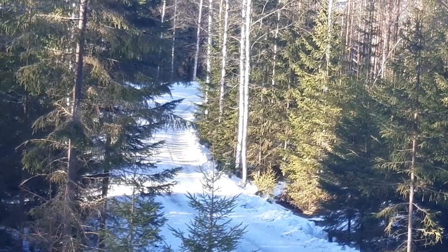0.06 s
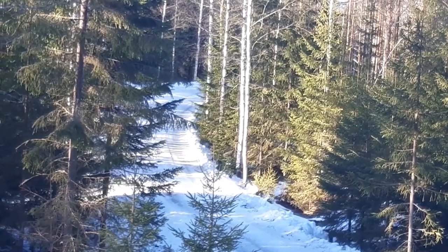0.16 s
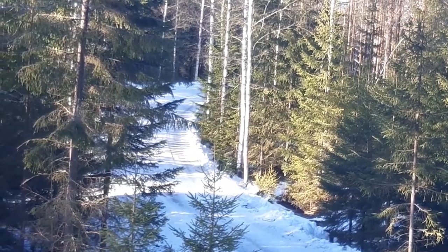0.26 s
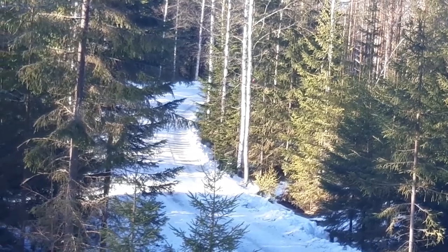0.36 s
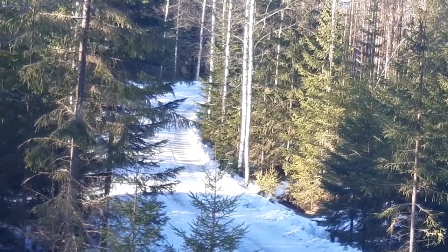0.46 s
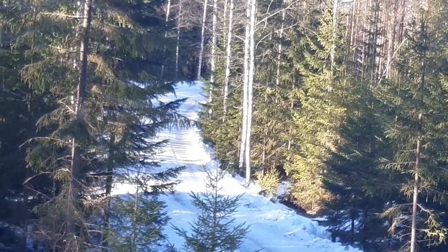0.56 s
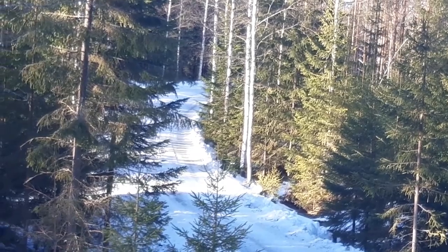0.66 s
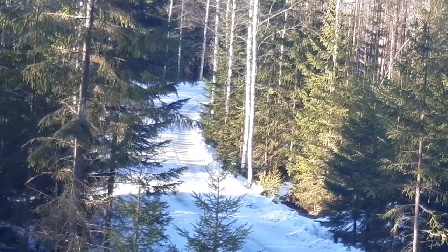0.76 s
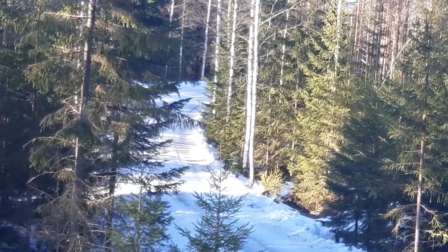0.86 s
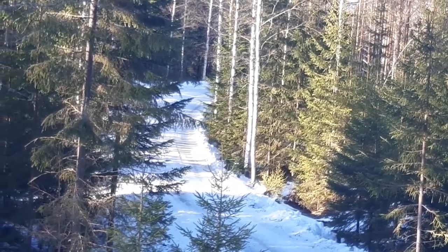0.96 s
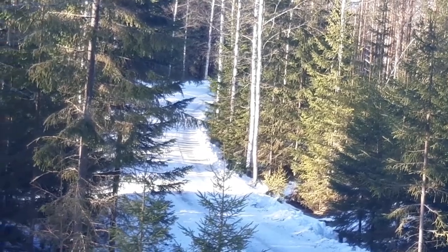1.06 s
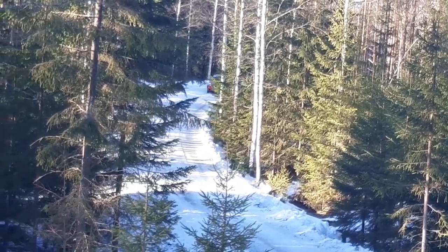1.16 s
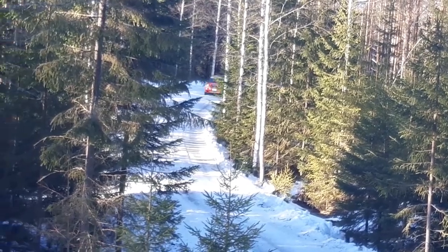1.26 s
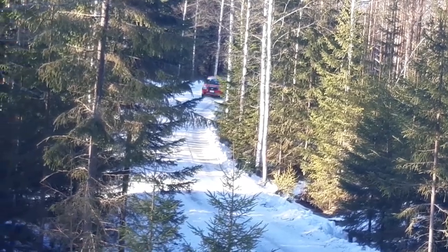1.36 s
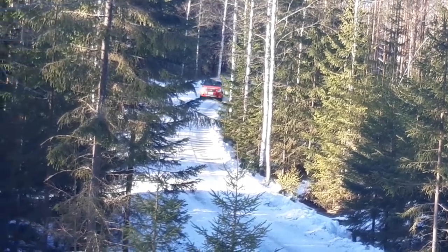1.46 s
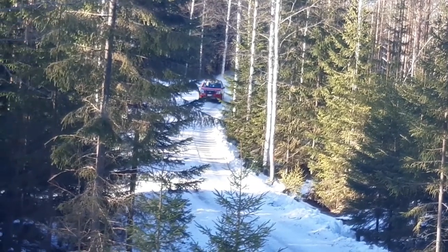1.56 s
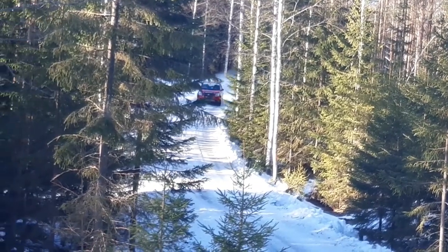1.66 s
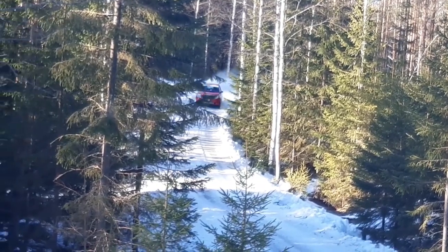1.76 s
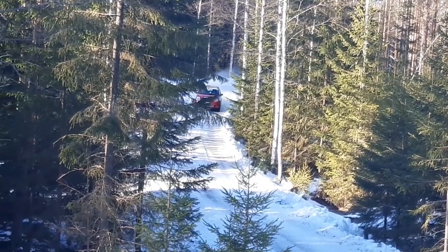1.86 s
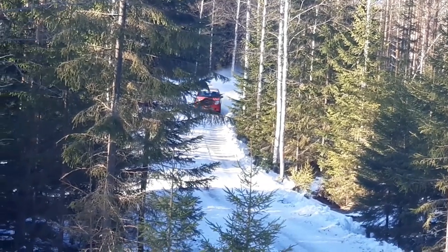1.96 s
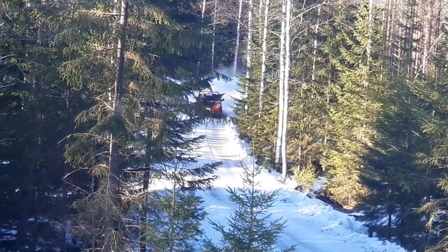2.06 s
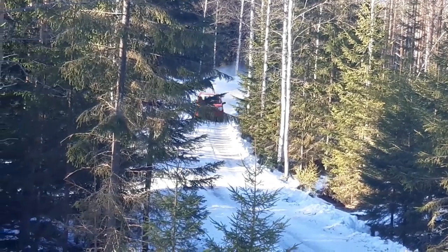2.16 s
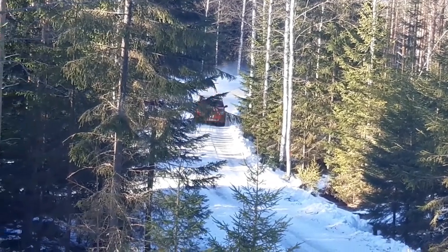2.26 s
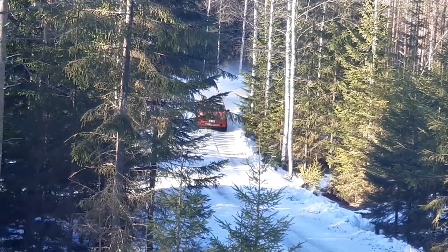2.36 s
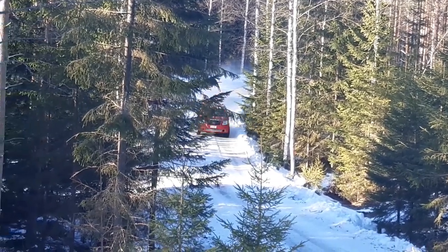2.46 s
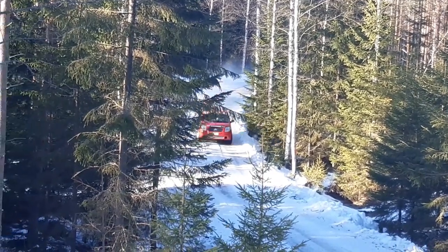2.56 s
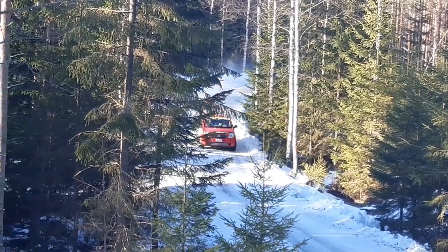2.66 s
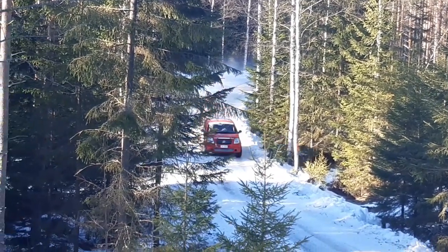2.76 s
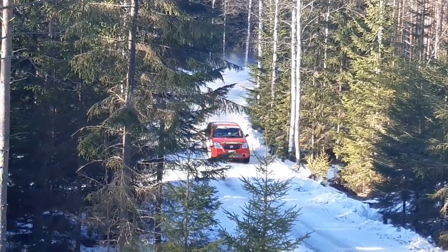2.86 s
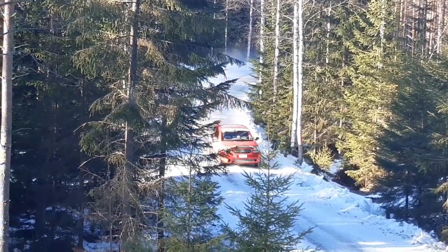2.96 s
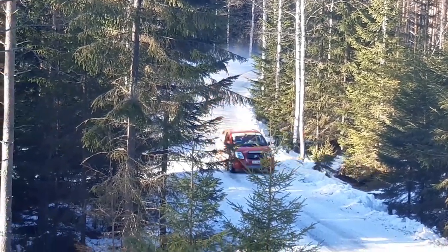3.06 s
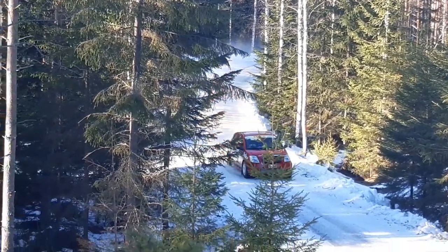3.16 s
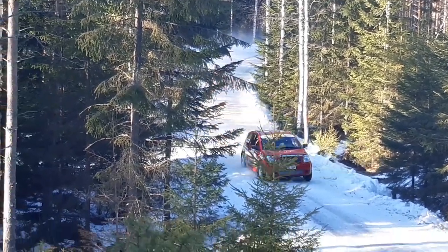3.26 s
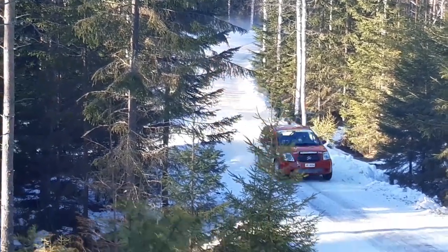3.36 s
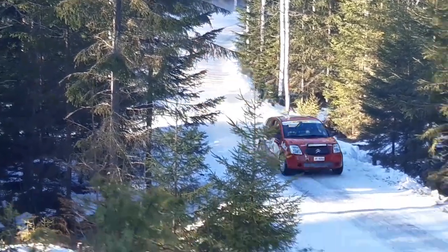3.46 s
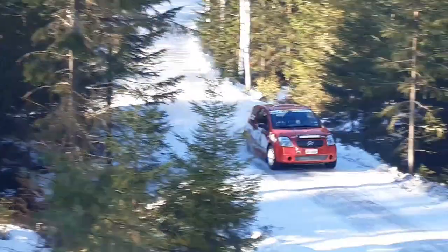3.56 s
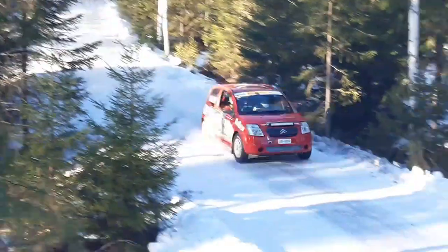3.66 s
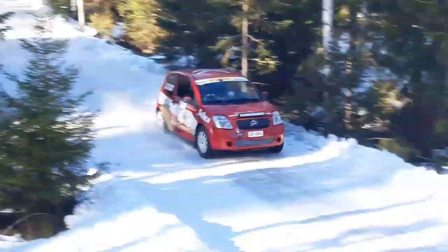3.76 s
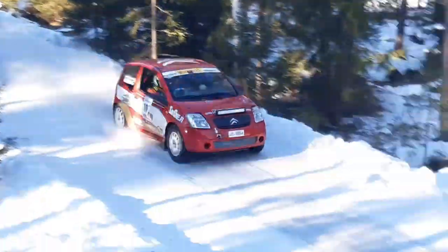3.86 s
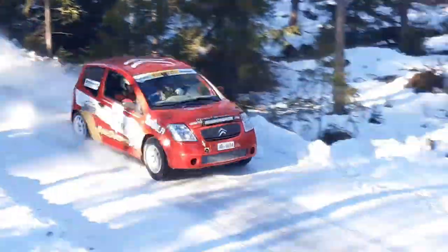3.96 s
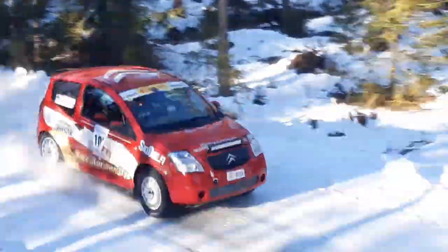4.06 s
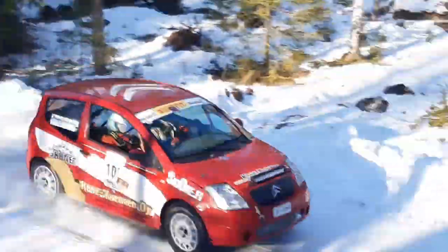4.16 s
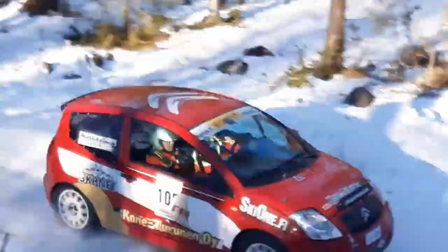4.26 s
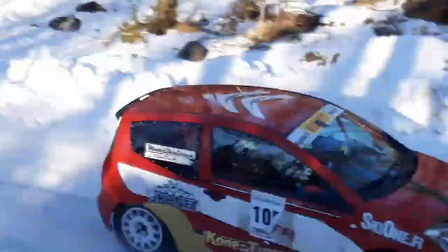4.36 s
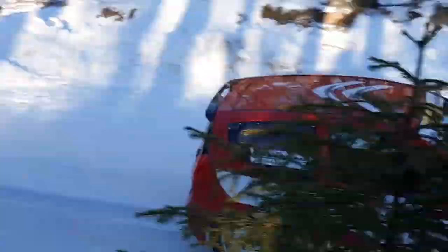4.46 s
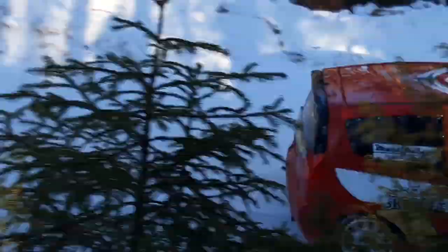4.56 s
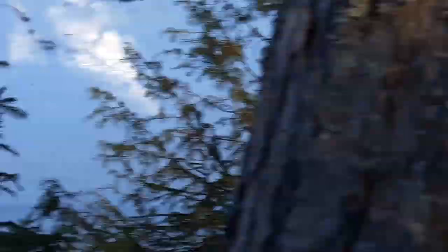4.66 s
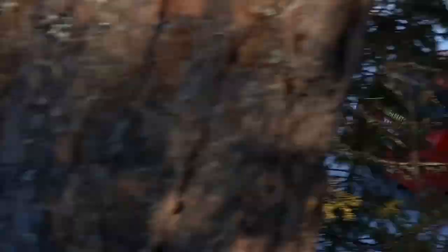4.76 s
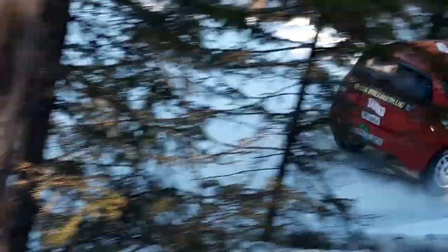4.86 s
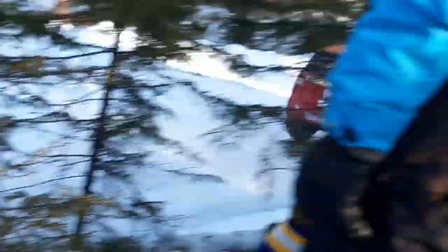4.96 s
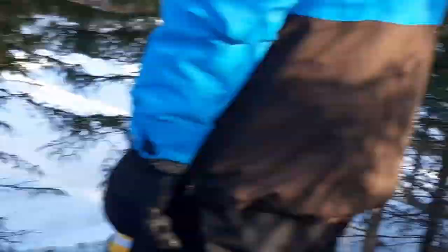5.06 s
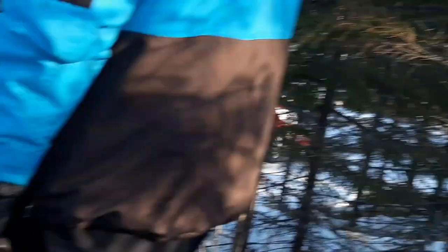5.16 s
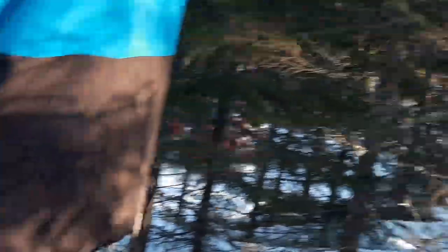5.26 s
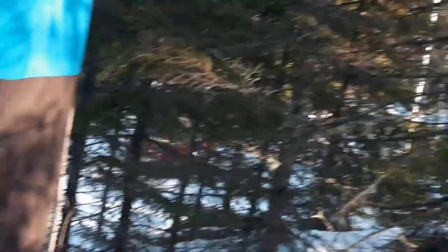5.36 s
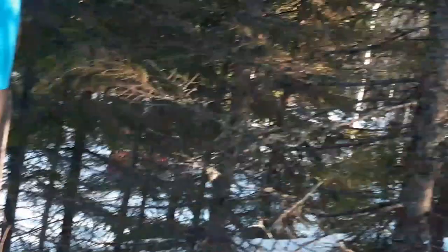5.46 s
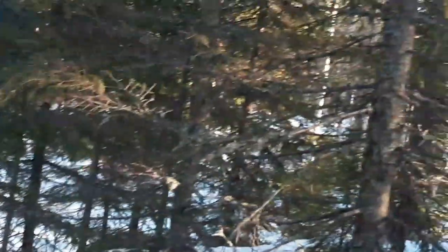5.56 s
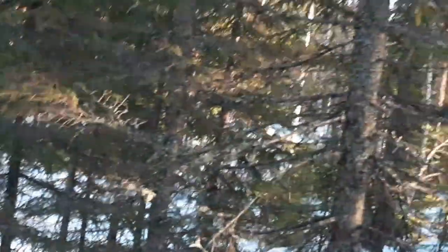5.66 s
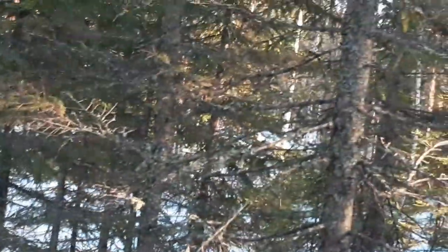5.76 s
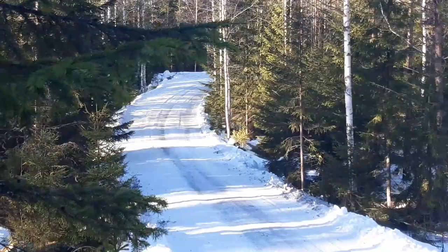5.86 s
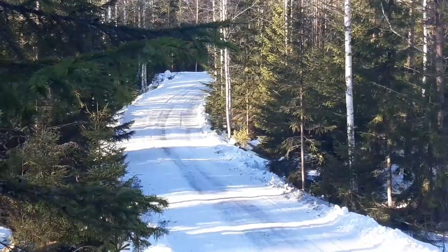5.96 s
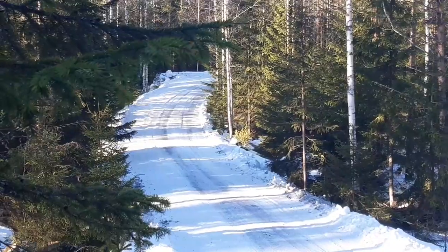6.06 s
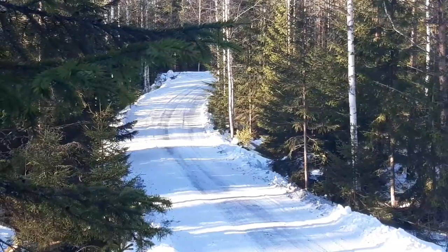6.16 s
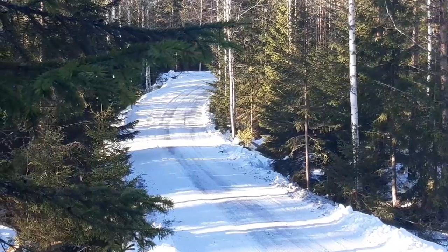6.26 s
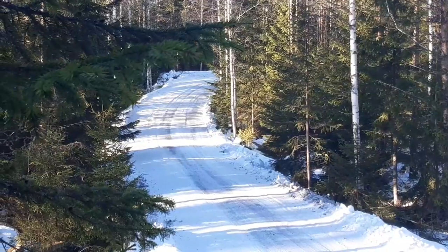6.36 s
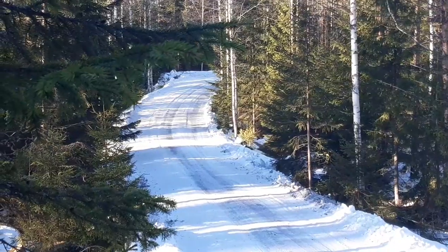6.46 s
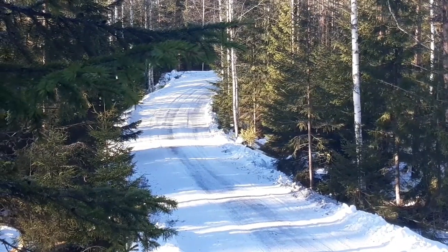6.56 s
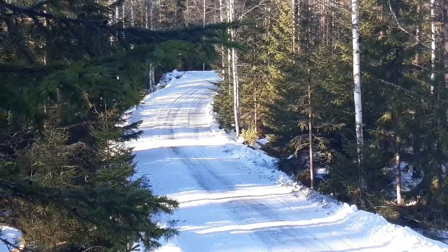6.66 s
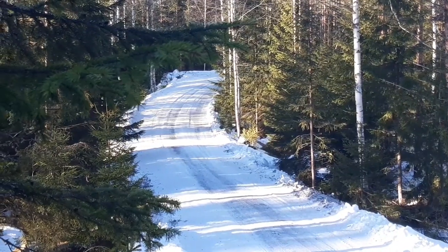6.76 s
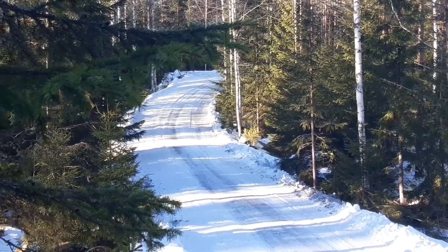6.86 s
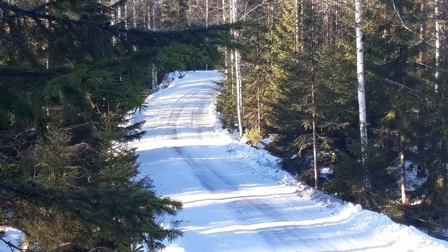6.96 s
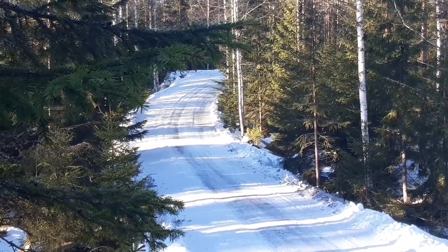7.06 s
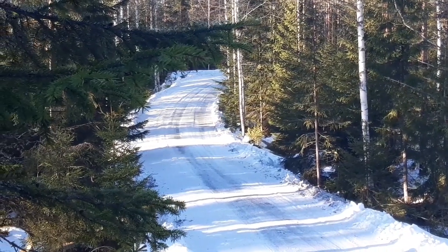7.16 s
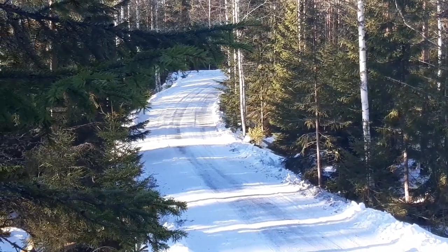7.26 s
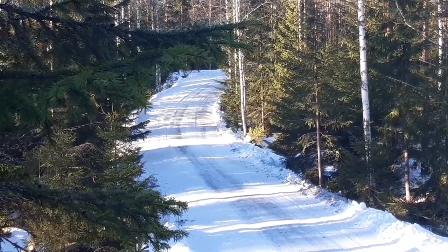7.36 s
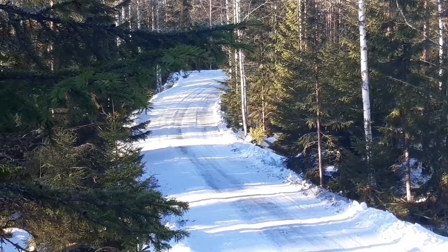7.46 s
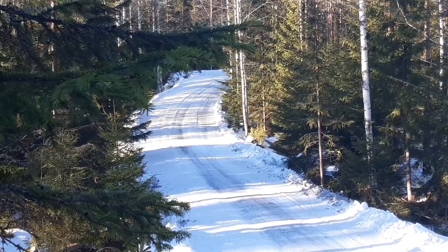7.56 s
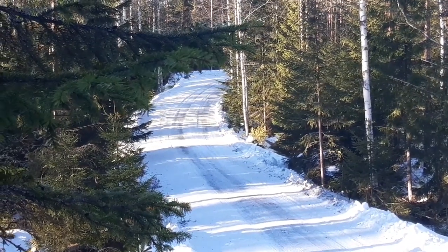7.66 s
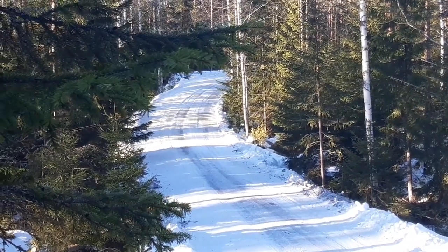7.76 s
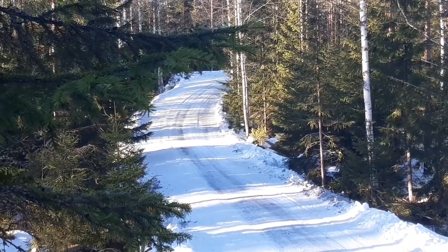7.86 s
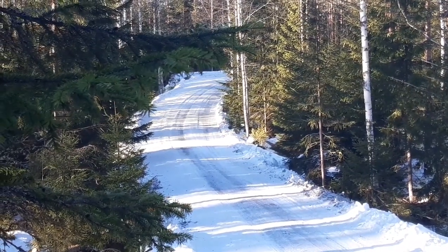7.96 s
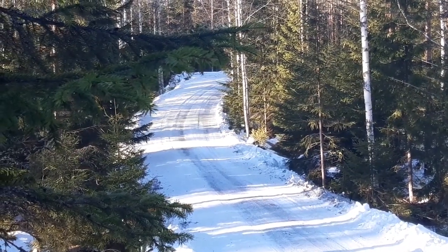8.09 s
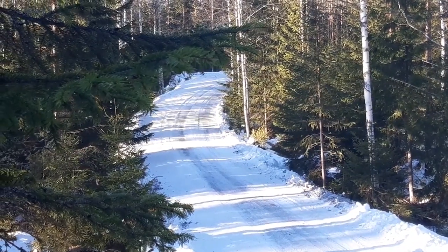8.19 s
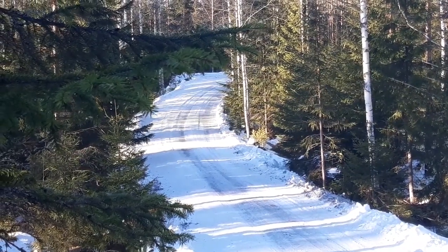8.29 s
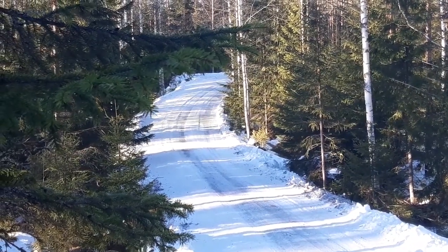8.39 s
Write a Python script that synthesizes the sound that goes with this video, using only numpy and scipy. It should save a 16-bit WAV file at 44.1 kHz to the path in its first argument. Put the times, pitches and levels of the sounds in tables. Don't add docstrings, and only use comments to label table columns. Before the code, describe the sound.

Small racing engine screams by on a snowy forest road, crackling as the throttle lifts; after a sudden cut, a faint far engine and fabric snaps.

```python
import sys
import numpy as np
from scipy import signal
from scipy.fft import rfft, irfft, next_fast_len
from scipy.io import wavfile
from scipy.ndimage import uniform_filter1d

SR = 44100
rng = np.random.default_rng(int(sys.argv[2]) if len(sys.argv) > 2 else 0)


def store_pcm(level_fs):
    pcm = np.round(np.clip(level_fs, -1, 1) * 32767).astype(np.int16)
    wavfile.write(sys.argv[1], SR, np.atleast_2d(pcm).T)


def volts(x):
    e = np.asarray(x, float) / 20
    return 10 ** e


N = 371610

CUT_S, RESUME_S = 5.7895, 5.8225
PASS_S, SPEED_M_S, CLOSEST_M, SOUND_M_S = 4.36, 20.0, 3.0, 343
USUAL_NEARNESS_DB = -40
NOSE_AWAY_S, PIPE_ROUND_S, ROAR_AWAY_S = 4.6, 4.38, 4.54
CRACK_SHUT_DB = -42

# t/s, f/Hz
REVS = [(.24, 216.7), (.62, 159), (.97, 221), (1.32, 223.8), (1.75, 245.1), (2.36, 248.2), (2.55, 268),
        (2.77, 274.4), (3.15, 254.2), (3.6, 262.6), (3.82, 277.7), (4.17, 290.7), (4.7, 278.7),
        (4.88, 301.1), (5.14, 270.1), (5.34, 293.5), (5.52, 260.7), (5.79, 276.3)]
# t/s, level/dB
LOAD = [(0, -47.5), (.22, -35), (.68, -42), (.95, -30), (1.45, -19), (1.75, -16.5), (2.25, -15.5),
        (2.55, -8.5), (2.78, -10.5), (3.3, -16.5), (3.82, -14), (3.94, -20), (4.15, -16), (4.33, -9),
        (4.55, -15.5), (5.3, -15.5), (5.52, -24.5), (5.79, -20.5)]
# t/s, half length/s, level/dB
TONE_SHADOWS = [(.5, 0.24, -8), (.9, .02, -1), (1.08, 0.06, -12), (1.165, 0.014, 9), (1.2, 0.026, -16.5),
                (1.25, 0.02, 0.5), (1.32, 0.09, -1), (3.93, 0.029, -6), (3.98, 0.039, 3.5),
                (4.05, 0.049, 1), (4.26, 0.018, 3.5), (4.85, 0.024, 2.5), (5.19, 0.016, -7.5),
                (5.3, 0.011, -1), (5.43, 0.045, 3)]
# t/s, half length/s, flutter/dB
FLUTTER = [(.55, .6, 4.8), (1.35, .25, .6), (4.0, .2, 1.5), (5.02, .12, 1.5)]
# t/s, half length/s, left-right/dB
TONE_LEANS = [(2.7, 0.3, -1.5), (4.3, 0.27, -2.5), (6.0, 0.75, 0)]
ORDER_GROUPS = [
    (2,),
    (3,),
    (.5, .25),
    (.75, 1.25),
    (1.75, 1.5),
    (2.25, 2.5),
    (2.75, 3.25),
    (3.5, 4.5),
]
# level/dB, share of nearness [1], change once turned/dB
ORDER_LAW = [(-39.5, 0.69, 8.5), (-35.5, 0.24, -0.5), (-44, 0.78, -3.5), (-38, 0.61, -3), (-42, 1, -37),
             (-42, 0.5, -32), (-46.5, .75, -25), (-49.5, 0.7, -25)]
FAINTER_DB = [0, 0, -9.5, -11, -2, -4, -5.5, -0.5]
# t/s, half length/s, level/dB
SECOND_SWELLS = [(.24, 0.053, 19.5), (2.05, 0.34, 6), (2.7, 0.33, -9), (3.4, 0.49, 13), (3.85, 0.19, -13),
                 (4.18, 0.1, 8), (4.45, 0.17, 12.5), (4.8, 0.17, -15), (5.55, 0.22, 0.5)]
# t/s, half length/s, level/dB
THIRD_SWELLS = [(0, 0.18, -21), (.26, 0.048, 3.5), (.44, 0.13, -11), (.74, 0.064, -8), (.6, 0.13, -11.5),
                (.85, 0.11, 3), (1.2, 0.086, 4), (1.5, 0.13, -10), (2.15, 0.3, 4.5), (3.2, 0.59, -5.5),
                (3.85, 0.12, -13), (4.06, 0.046, 9), (4.4, 0.06, 10), (4.62, 0.058, 6.5),
                (4.8, 0.091, 12.5), (5.08, .06, 5), (5.27, 0.098, 2), (5.6, .2, -4)]
# t/s, half length/s, level/dB
HALF_SWELLS = [(.35, 0.36, -9), (2.0, 0.57, 2), (3.55, 0.11, -8), (4.3, 0.085, 8)]
# t/s, half length/s, level/dB
SUB_SWELLS = [(.35, .2, -12), (2.7, .3, -16), (4.1, .18, 8), (4.7, .15, -5), (5.3, .12, 6)]
# t/s, half length/s, level/dB
RASP_SWELLS = [(2.2, .7, -2), (3.45, 0.24, 7.5), (3.82, 0.089, 3), (4.03, 0.074, -1.5), (4.2, 0.077, 0),
               (4.35, 0.11, -5)]
# t/s, half length/s, level/dB
LOWER_RASP_SWELLS = [(3.9, 0.073, 5.5), (4.17, .1, -3.5)]
# t/s, half length/s, level/dB
UPPER_SWELLS = [
    [(4.02, 0.1, -31.5), (4.38, 0.092, -43), (4.57, .05, -24.5), (4.65, 0.062, -27.5), (4.78, 0.08, -21.5),
     (4.87, 0.034, -34.5), (5.53, .07, -43.5), (5.72, 0.13, -41)],
    [(4.27, .05, -32.5), (4.42, 0.12, -29), (4.62, 0.058, -22), (4.76, 0.075, -25.5), (4.86, .04, -36),
     (5.22, .03, -39), (5.52, 0.045, -42), (5.67, 0.057, -40)],
    [(4.28, .07, -39), (4.44, .05, -38), (4.53, 0.074, -25.5), (4.63, 0.036, -32), (4.8, 0.18, -31.5),
     (5.27, .06, -47)],
    [(4.5, 0.055, -24.5), (4.57, 0.048, -35), (4.8, .1, -33), (5.48, .08, -42), (5.72, 0.13, -41.5)],
    [(4.41, .03, -27), (4.63, 0.045, -29), (4.76, 0.11, -28.5), (4.87, 0.025, -28), (5.52, .04, -44),
     (5.7, .05, -43)],
    [(4.2, .04, -36), (4.6, .1, -32.5), (4.76, 0.077, -29.5), (5.46, .05, -42), (5.66, 0.066, -45)],
    [(4.58, .04, -35.5), (4.65, 0.045, -34), (4.77, 0.069, -32.5)],
]
# shut t/s, open t/s, final loss/dB
LIFTS = [
    (4.88, 5.176, -12.5),
    (5.32, 5.382, -14),
]
# t/s, half length/s, level/dB
CRACK_SWELLS = [(4.46, 0.041, 0), (4.6, 0.033, 2.5), (4.82, 0.07, -1), (5.6, .2, -10)]
# t/s, delay/ms
GROUND_MS = [(0, .7), (4.42, 0.53), (4.52, .52), (4.57, 0.8), (4.89, 0.888), (5.17, 1.9), (5.38, 1.015)]
# f/Hz, width/Hz, level/dB
TAILPIPE = (1060, 380, 3)
# t/s, peak/dB, thump/dB, spit over peak/dB
POPS = [
    (4.8933, -4, -19, -1),
    (4.9073, -4, -19, -6),
    (4.9325, -8, -19, 1),
    (4.940, -20, -24, -4),
    (4.951, -14, -19, 2),
    (4.986, -26, -24, 17),
    (5.000, -17, -24, -6),
    (5.008, -23, -28, -6),
    (5.170, -17, -27, -12),
    (5.383, -22, -26, -14),
]
# f/Hz, width/Hz, share [1]
POP_DIP = (1150, 500, .4)
# t/s, level/dB
NEARNESS = [(0, -59.5), (.2, -58.5), (.31, -49.5), (.42, -58.5), (.76, -58.5), (.92, -47.5), (1.5, -42.5),
            (2.8, -40.5), (3.4, -38.5), (4.06, -27.5), (4.34, -30.5), (4.6, -30.5), (4.87, -30.5),
            (5.01, -35.5), (5.14, -43.5), (5.5, -41), (5.79, -42.5)]
# t/s, left-right/dB
PAN = [(0, 3.5), (2, 0.9), (3.5, 1.5), (4.1, 4.5), (4.7, 4), (5, 1.5), (5.8, 0.5)]
# f/Hz, density/dB per Hz
ROAR = [(100, -17.5), (160, -16.5), (230, 10), (350, -3.5), (550, 0.5), (800, -2.5), (1200, -4),
        (1900, -7.5), (2600, -9.5), (3600, -27)]
# t/s, half length/s, level/dB
ROAR_SWELLS = [(2.5, .3, 1), (3.95, 0.45, 0.5), (4.2, 0.13, -0.5), (4.7, 0.084, -1.5), (5.1, 0.076, -1)]
# f/Hz, width/Hz, level/dB
BODY_AHEAD = [(627, 115, -2), (1016, 90, -0.5), (2477, 490, -13.5)]
# f/Hz, width/Hz, level/dB
BODY_BEHIND = [(830, 130, -4.5), (1840, 300, -0.5), (2700, 450, -6)]
# t/s, half length/s, share [1]
ROAR_DIP = [(3.87, 0.34, .5), (2.3, .3, .25)]
# t/s, half length/s, level/dB
RASP = [
    (4.0, 0.42, -35.5),
    (4.42, 0.23, -30),
]
# t/s, delay/ms, share [1]
BANK_ECHO = [(0, 2.1, .45), (2.9, 2.1, .6), (3.4, 2.06, .55), (3.8, 1.99, .55), (4.0, 1.95, .5),
             (4.15, 1.85, .45), (4.4, 1.75, .15), (5.8, 1.75, .1)]
# f/Hz, density/dB per Hz
HISS = [(2500, -0.5), (3500, -0.5), (4500, -1), (6500, -5), (9000, -0.5)]
# t/s, half length/s, level/dB
SNOW_GUSTS = [(1.2, 0.26, -2), (2.2, 0.26, -2), (2.72, .08, 4.5), (4.5, 0.022, -3), (4.7, .04, -0.5),
              (4.79, .03, -3), (4.85, 0.032, 3), (4.965, 0.027, -4), (5.03, .035, 8), (5.08, .015, 8)]
# t/s, half length/s, level/dB
RUMBLE_SWELLS = [(.4, .4, 0.5), (2.1, .5, -7), (3.5, .3, 3), (4.5, .2, -2), (5.25, .15, 3.5),
                 (5.65, .1, -12)]
# t/s, half length/s, level/dB
BOOMS = [
    (.45, 1, -36.5),
    (.97, 0.06, -24),
    (1.36, 0.16, -25.5),
    (1.6, 0.22, -34.5),
]
# t/s, half length/s, level/dB
COUGHS = [
    (0.22, 0.065, -35),
    (5.18, 0.011, -27.5),
    (5.388, 0.01, -30),
    (5.325, 0.011, -28.5),
]
# t/s, half length/s, f/Hz, level/dB
SQUEALS = [
    (0.026, 0.041, 2460, -46),
    (0.605, 0.037, 2600, -43),
    (0.51, 0.36, 630, -41.5),
]
# t/s, half length/s, level/dB
HANDLING = [
    (.1, .3, -54),
    (5.3, .25, -53),
    (5.75, .06, -54),
]
# t/s, firing f/Hz, tone level/dB
FAR = [(5.83, 191, -44), (6.17, 196.7, -47.5), (6.75, 249.2, -43.5), (7.05, 265.7, -48.5),
       (7.65, 267.6, -40), (8.1, 285.6, -34), (8.42, 293, -36)]
# multiple of firing rate [1], level re tone/dB
FAR_ORDERS = [(0.749, -43), (1.499, -9.5)]
# f/Hz, density/dB per Hz
DRONE = [(30, -26), (70, -16), (120, -17), (180, -13), (260, -7.5), (400, -4.5), (700, -6), (1000, -11),
         (1400, -11), (1900, -25), (2600, -22), (3300, -38)]
# f/Hz, width/Hz, level/dB
HOLLOWS = [(375, 30, 3), (440, 30, 3), (585, 30, 5), (685, 35, 6), (735, 30, 2)]
# t/s, half length/s, f/Hz, level/dB
CHIRPS = [
    (7.13, .05, 5900, -76),
]
# t/s, half length/s, level/dB
RUSTLE = [
    (5.82, 0.11, -62),
    (6.46, 0.089, -61.5),
    (7.27, 0.07, -59.5),
    (7.64, 0.13, -51.5),
    (7.81, 0.025, -62),
    (6.68, 0.014, -58),
    (7.05, 0.071, -73),
    (8.29, 0.038, -57.5),
]
# t/s, peak/dB, left-right/dB, ring f/Hz, half length/ms
SNAPS = [(6.146, -50, 1, 5800, 3), (6.189, -40, 1, 5750, 3.5), (6.257, -42, 2.5, 5700, 3),
         (6.258, -47, 2.5, 7300, 2.5), (6.351, -45, 1, 5600, 2), (6.405, -52, 3, 6000, 2),
         (6.423, -42, 3, 5900, 2), (6.428, -41, 4, 5600, 2), (6.434, -47, -3, 6500, 3),
         (6.434, -42, 0, 4400, 4), (6.434, -42, 0, 2100, 3), (6.671, -43, 8, 5500, 2.6),
         (7.179, -50, 6, 5440, 3), (7.461, -46, 9, 4500, 2), (7.656, -47, 5, 11960, 2),
         (7.695, -32, 12, 7000, 2.2), (7.695, -32, 14, 11350, 2.2), (7.812, -50, 1, 6030, 3),
         (8.29, -42, 15, 5000, 3), (8.3, -32.5, 19, 5800, 2.1), (8.301, -29, 13, 3780, 2.7),
         (8.302, -38, 13, 1694, 3), (8.302, -32, 10, 2700, 2), (8.311, -41, 14, 6500, 2)]
# f/Hz, density/dB per Hz
FABRIC = [(2800, -9), (3300, -12), (3600, -22), (4100, -2), (5200, -4), (7000, 0), (9300, 2), (12000, 3),
          (14500, 9), (16000, 7)]
# f/Hz, likeness [1]
LIKENESS = [(40, .8), (70, 0.8), (150, 0.99), (380, 0.93), (950, 0.36), (2380, 0.45), (5980, 0.05),
            (15000, -0.03)]
# f/Hz, width/Hz
GRIP_NOTCH = (3550, 500)
# t/s, lag [samples]
RIGHT_LAG = [(0, 1), (3, 2), (4, 4), (5.8, 4), (5.81, 22), (8.43, 22)]
# f/Hz, level/dB
MIC = [(30, -9.5), (100, 0.5), (7000, 0), (7600, -7.5), (8400, -23), (9500, -16), (12000, -12.5),
       (16000, -17)]


def firing_turns():
    along_m = SPEED_M_S * (np.arange(N) / SR - PASS_S)
    doppler = 1 + SPEED_M_S / SOUND_M_S * along_m / np.hypot(along_m, CLOSEST_M)
    hz = in_time(REVS)[0] * (1 + .006 * drift(7.0)) / doppler
    return np.cumsum(hz) / SR


def firing_tone(turns, near_db):
    flutter_db = .5 + swells(FLUTTER)
    tone_db = in_time(LOAD)[0] + swells(TONE_SHADOWS) + flutter_db * drift(30)
    tone = np.sqrt(2) * volts(tone_db) * np.cos(2 * np.pi * turns)
    favoured_db = [swells(rows) for rows in (SECOND_SWELLS, THIRD_SWELLS, HALF_SWELLS, SUB_SWELLS)]
    favoured_db += [1.5 * drift(3) + swells(RASP_SWELLS) for _ in ORDER_GROUPS[4:]]
    favoured_db[4] += swells(LOWER_RASP_SWELLS)
    groups = zip(ORDER_GROUPS, ORDER_LAW, favoured_db, FAINTER_DB)
    for multiples, (db, follows, behind_db), swell_db, faint_db in groups:
        level_db = db + follows * near_db + behind_db * turned(NOSE_AWAY_S) + swell_db
        tone += orders(turns, zip(multiples, (0, faint_db)), level_db, .7 * flutter_db + 1.4)
    return tone * volts(throttle()[0])


def tailpipe_cracks(turns, near_db):
    build_db = throttle()[1]
    crack_db = -35 + near_db + 17.5 * turned(PIPE_ROUND_S) + build_db + swells(CRACK_SWELLS)
    at = np.flatnonzero(np.diff(np.floor(turns)))[:-1]
    late = rng.integers(0, 6, N)
    uneven = rng.standard_normal(N)
    fired = np.zeros(N)
    fired[at + late[at]] = volts(crack_db[at] + 1.3 * uneven[at])
    fronts = spikes(fired, blunt_hz=5200, echo_ms=in_time(GROUND_MS)[0])
    cracks = passed(fronts, 2400, "high", order=4)
    upper = 0
    for k, rows in enumerate(UPPER_SWELLS, 4):
        upper = upper + swells(rows, volts) * orders(turns + .2 / k, [(k, 0)], 0, 1.8)
    upper = upper * volts(1.6 * np.interp(turns, np.arange(N), uneven))
    return cracks + upper * (build_db > CRACK_SHUT_DB / 2)


def throttle():
    t, tone_db, crack_db, snap_db = np.arange(N) / SR, 0, 0, -8.5
    for shut, opened, lost_db in LIFTS:
        closed = (t >= shut) & (t < opened)
        since = np.where(t >= opened, t - opened, np.inf)
        tone_db = tone_db + closed * (snap_db + (lost_db - snap_db) * (t - shut) / (opened - shut))
        tone_db = tone_db + 12.5 * np.exp(-since / .013)
        tone_db = tone_db - 6 * np.exp(-since / .06)
        crack_db = crack_db + closed * CRACK_SHUT_DB - 15 * np.exp(-since / .09)
    return uniform_filter1d(tone_db, size=150), crack_db


def spikes(clicks, blunt_hz, echo_ms):
    r = np.exp(-2 * np.pi * blunt_hz / SR)
    blunted = signal.lfilter([np.e * (1 - r)], [1, -2 * r, r * r], clicks)
    front = passed(blunted, 350, "high", order=1)
    hz, width_hz, db = TAILPIPE
    front = front + volts(db) * peaked(front, hz, width_hz)
    return front + .8 * delayed(front, echo_ms * SR / 1000)


def pops():
    s, peak_db, thump_db, spit_db = np.transpose(POPS)
    crack, thump, burst = np.zeros((3, N)) + 1e-18
    at = (s * SR).round().astype(int)
    crack[at], thump[at], burst[at] = volts(peak_db), volts(thump_db), volts(peak_db + spit_db)
    spit_env = signal.lfilter([1], [1, -np.exp(-1 / (.002 * SR))], burst)
    spit = spit_env * passed(rng.standard_normal((2, N)), 1200, "high")
    crack = spikes(crack, blunt_hz=7000, echo_ms=.8)
    hz, width_hz, share = POP_DIP
    crack = crack - share * peaked(crack, hz, width_hz)
    return 2.0 * crack + .65 * spit + 330 * passed(thump, [75, 150], "band")


def engine_roar(turns, near_db, away, puffs):
    gas = banded_noise(ROAR, patchy_db=1.2, count=14, centre=cyclic_noise(turns, memory=.45))
    rasp = swells(RASP, volts) * rms_one(passed(gas, [1650, 2400], "band"))
    shell = (1 - away) * resonant(gas, BODY_AHEAD) + away * resonant(gas, BODY_BEHIND)
    shell -= np.clip(swells(ROAR_DIP), 0, 1) * passed(shell, [860, 1180], "band", order=1)
    ahead_db, behind_db = -22.5 + .77 * near_db, -31 + .24 * near_db
    roar_db = (1 - away) * ahead_db + away * behind_db + .052 * throttle()[0] + swells(ROAR_SWELLS)
    return rasp + volts(roar_db) * puffs * shell


def cyclic_noise(turns, memory):
    cycles = rng.standard_normal((2, 2, int(turns[-1]) // 4 + 2, 512))
    cycles = signal.lfilter([1], [1, -np.clip(memory, 0, .95)], cycles, axis=2).reshape(4, -1)
    return np.array([np.interp(turns * 128, np.arange(c.size), c) for c in cycles]).reshape(2, 2, N)


def tyre_hiss(near_db, puffs):
    hiss_db = near_db + USUAL_NEARNESS_DB + 6.0 + .23 * throttle()[0]
    return volts(hiss_db) * puffs * banded_noise(HISS, patchy_db=1.1, count=5)


def snow_spray(near_db, away):
    screened_db = 1.7 * np.minimum(near_db + USUAL_NEARNESS_DB + 44.5, 0)
    spray_db = -36 + near_db + screened_db + swells(SNOW_GUSTS) + 1.8 * drift(14) + away
    return volts(spray_db) * rms_one(passed(rng.standard_normal((2, N)), [8800, 16000], "band", order=4))


def road_rumble(near_db, away):
    rumble_db = -47.5 + .42 * near_db + away + swells(RUMBLE_SWELLS)
    return volts(rumble_db) * banded_noise([(30, 0.0), (60, -1.0), (120, 11.5)], patchy_db=1.5, count=4)


def noise_bursts(rows, band_hz):
    return swells(rows, volts) * rms_one(passed(rng.standard_normal(N), band_hz, "band"))


def squeals(rows):
    return sum(noise_bursts([(s, half, db)], [hz - 60, hz + 60]) for s, half, hz, db in rows)


def banked(x):
    echo_ms, share = in_time(BANK_ECHO)
    high = signal.sosfiltfilt(signal.butter(2, [1500, 5000], "band", fs=SR, output="sos"), x)
    late = np.array([delayed(side, echo_ms * SR / 1000) for side in high])
    return x - np.clip(share, 0, 1) * late


def forest(x, t60_s):
    t = np.arange(round(t60_s * SR)) / SR
    tail = rng.standard_normal((3, len(t))) * volts(-60 * t / t60_s) * np.minimum(t / 0.013, 1)
    tail = passed(tail[0] + 0.27 * tail[1:], 2300, "low", order=1)
    return signal.fftconvolve(x[None], tail / np.sqrt(np.sum(tail ** 2) / 2), axes=1)[:, :N]


def near_car():
    near_db = in_time(NEARNESS)[0] - USUAL_NEARNESS_DB
    away = turned(ROAR_AWAY_S, turn_s=.33)
    pan_db, = in_time(PAN)
    turns = firing_turns()
    tone, cracks = firing_tone(turns, near_db), tailpipe_cracks(turns, near_db)
    puffs = 1 + 0.082 * np.cos(2 * np.pi * turns)
    roar, hiss = engine_roar(turns, near_db, away, puffs), tyre_hiss(near_db, puffs)
    lagged = np.array([tone, delayed(tone, .062 * SR / 1000)])
    direct = panned(lagged, .3 - 0.28 * pan_db + swells(TONE_LEANS))
    direct += panned(cracks + pops(), pan_db) + snow_spray(near_db, away)
    direct += banked(panned(roar, pan_db) + panned(hiss, .3 * pan_db))
    low = road_rumble(near_db, away) + noise_bursts(HANDLING, [18, 45])
    boom = noise_bursts(BOOMS, [240, 285]) + noise_bursts(COUGHS, [420, 950])
    return direct + low + boom + squeals(SQUEALS) + volts(-21) * forest(tone + 2 * cracks, t60_s=.7)


def clothing():
    rustle = volts(-76) + swells(RUSTLE, volts)
    out = volts(10.0) * rustle * banded_noise(FABRIC, patchy_db=2.2, count=7)
    t = (np.arange(900) - 400) / SR
    for s, peak_db, pan_db, hz, half_ms in SNAPS:
        i = round(s * SR) - 400
        burst = rng.standard_normal((2, 900)) * np.exp(-(1000 * t / half_ms) ** 2)
        snap = passed(burst, [.6 * hz, 15000], "band", order=1)
        snap = .5 * snap + volts(9) * peaked(snap, hz, hz / 8.7)
        out[:, i:i + 900] += panned(volts(peak_db - 6) * snap, .4 * pan_db)
    return out


def far_car():
    hz, tone_db = in_time(FAR)
    since_s = np.maximum(np.arange(N) / SR - RESUME_S, 0)
    lines = orders(np.cumsum(hz) / SR, [(1, 0)] + FAR_ORDERS, tone_db - .7, 2.0)
    boom = volts(-38 - 2.5 * since_s) * rms_one(passed(rng.standard_normal(N), [195, 245], "band"))
    bands = banded_noise(DRONE, patchy_db=.7, count=16)
    drone = volts(-41 + 2 * since_s) * resonant(bands, HOLLOWS)
    haze = volts(-8 * np.exp(-since_s / 1.2)) - 1
    drone += haze * passed(drone, [1300, 2600], "band", order=1)
    return panned(lines + boom, 1.3) + volts(-14) * forest(lines, t60_s=1.2) + drone + squeals(CHIRPS)


def microphone_air():
    return volts(-58) * rms_one(passed(rng.standard_normal((2, N)), 6500, "high", order=1))


def gripped(x):
    return x - .85 * peaked(x, *GRIP_NOTCH)


def orders(turns, table, level_db, flutter_db):
    out = 0
    for k, db in table:
        gain = np.sqrt(2) * volts(level_db + db + flutter_db * drift(43))
        phase = rng.random() if k % 1 else -.25
        out = out + gain * np.cos(2 * np.pi * (k * turns + phase))
    return out


def banded_noise(spectrum, patchy_db, count, centre=None):
    out, together = 0, drift(4.0)
    edges = np.geomspace(spectrum[0][0], spectrum[-1][0], count + 1)
    white = rng.standard_normal((2, 2, N)) if centre is None else centre
    for k, (low, high) in enumerate(zip(edges, edges[1:])):
        mid, side = passed(white[k % 2], [low, high], "band")
        hz = np.sqrt(low * high)
        alike = np.clip(at_hz(LIKENESS, hz), 0, 1)
        gain = volts(at_hz(spectrum, hz) + patchy_db * (0.7 * together + drift(36)))
        out = out + gain * (np.sqrt(1 + alike) * mid + np.sqrt(1 - alike) * side * [[1], [-1]])
    return rms_one(out)


def resonant(x, peaks):
    return rms_one(x + sum(volts(db) * peaked(x, hz, width_hz) for hz, width_hz, db in peaks))


def peaked(x, hz, width_hz):
    return signal.lfilter(*signal.iirpeak(hz, hz / width_hz, fs=SR), x)


def passed(x, hz, kind, order=2):
    return signal.sosfilt(signal.butter(order, hz, kind, fs=SR, output="sos"), x)


def delayed(x, samples):
    return np.interp(np.arange(N) - samples, np.arange(N), x)


def panned(x, db):
    return x * np.array([volts(db / 2), volts(-db / 2)]).reshape(2, -1)


def swells(rows, scale=float):
    t = np.arange(0, N + 40, 40) / SR
    bells = sum(scale(top) * np.exp(-((t - s) / half) ** 2) for s, half, top in rows)
    return np.interp(np.arange(N) / SR, t, bells)


def turned(s, turn_s=.09):
    return .5 + .5 * np.tanh((np.arange(N) / SR - s) / turn_s)


def drift(rate_hz):
    r = np.exp(-80 * np.pi * rate_hz / SR)
    slow = signal.lfilter([1], [1, -2 * r, r * r], rng.standard_normal(N // 40 + 2002))[2000:]
    return np.interp(np.arange(N) / 40, np.arange(len(slow)), rms_one(slow))


def in_time(rows):
    s, *columns = np.transpose(rows)
    return [np.interp(np.arange(N) / SR, s, c) for c in columns]


def at_hz(points, hz):
    f, db = np.transpose(points)
    return np.interp(np.log(hz), np.log(f), db)


def rms_one(x):
    return x / np.sqrt(np.mean(x ** 2) + 1e-20)


def scene():
    t = np.arange(N) / SR
    air = microphone_air()
    passing = (near_car() + air) * (t < CUT_S)
    distant = (gripped(far_car() + clothing()) + air) * (t > RESUME_S)
    left, right = passing + distant
    return np.array([left, delayed(right, in_time(RIGHT_LAG)[0])])


def top_cut(x):
    return signal.sosfilt(signal.butter(12, 15870, fs=SR, output="sos"), x)


def record(dry):
    size = next_fast_len(N)
    response = volts(at_hz(MIC, np.fft.rfftfreq(size, 1 / SR) + 1))
    coloured = irfft(rfft(dry, size) * response, size)[:, :N]
    rounded = 1.15 * np.tanh(coloured / 1.15)
    return top_cut(rounded)


dry = scene()
out = record(dry)
store_pcm(out)
```